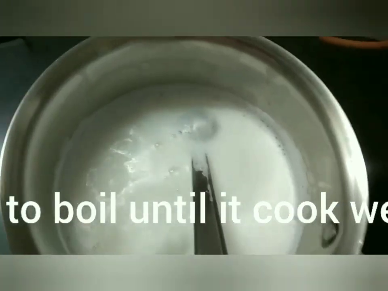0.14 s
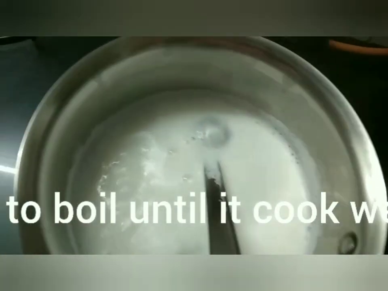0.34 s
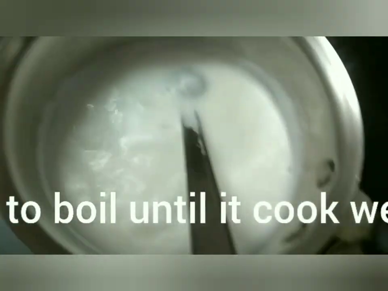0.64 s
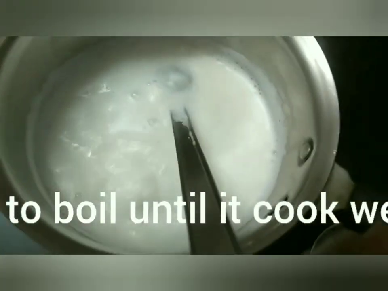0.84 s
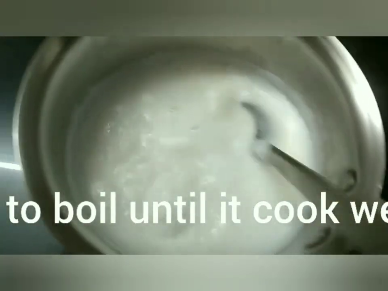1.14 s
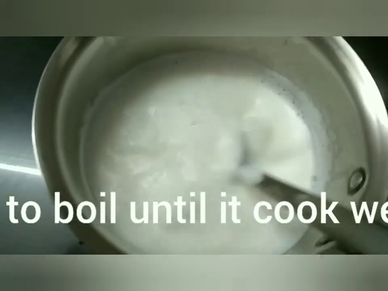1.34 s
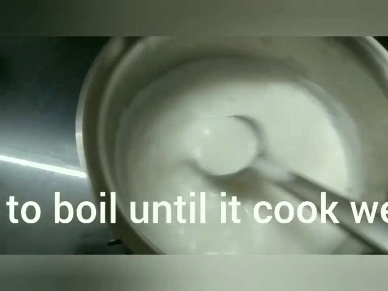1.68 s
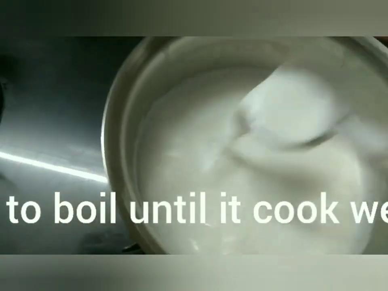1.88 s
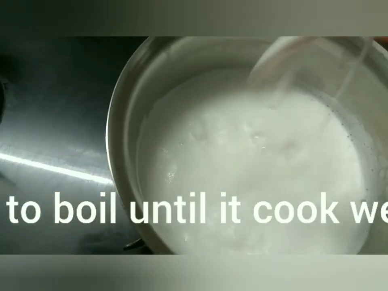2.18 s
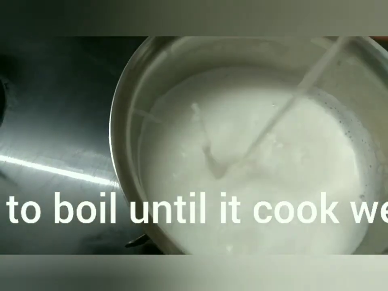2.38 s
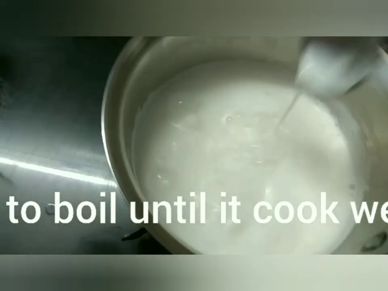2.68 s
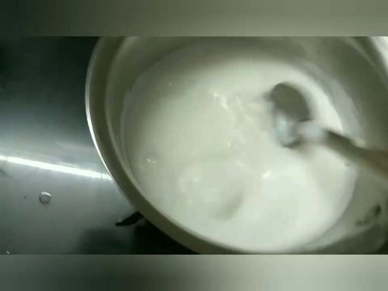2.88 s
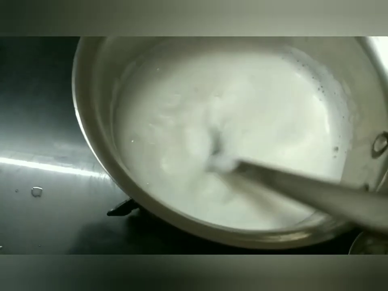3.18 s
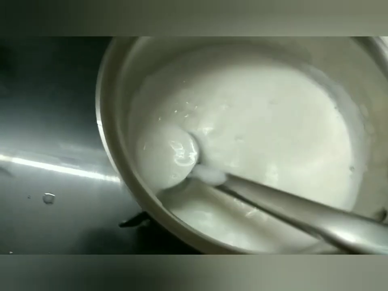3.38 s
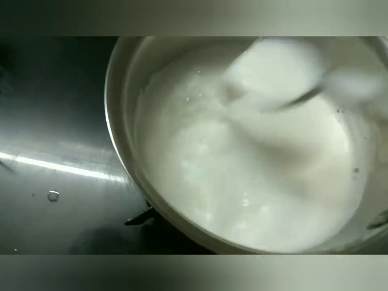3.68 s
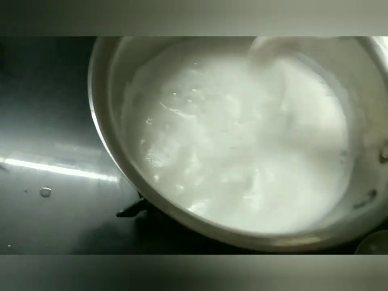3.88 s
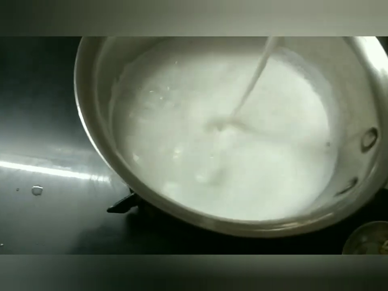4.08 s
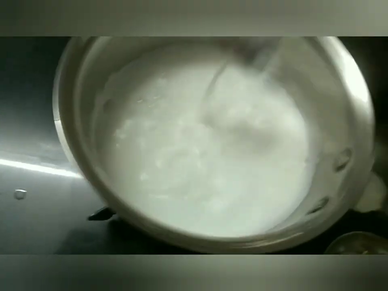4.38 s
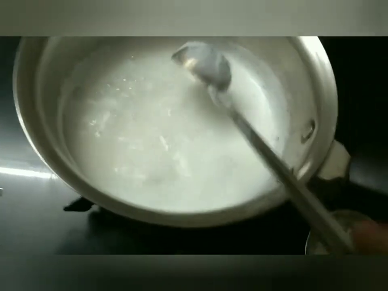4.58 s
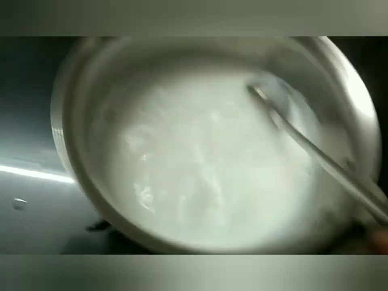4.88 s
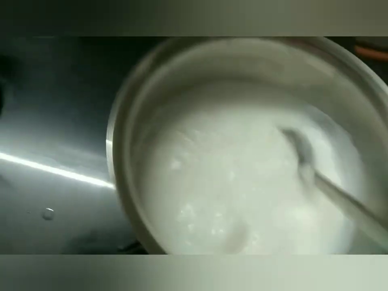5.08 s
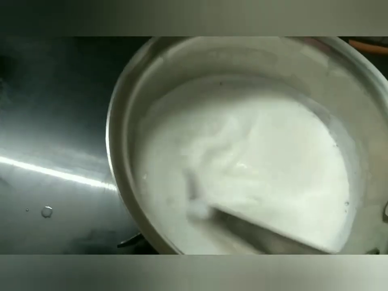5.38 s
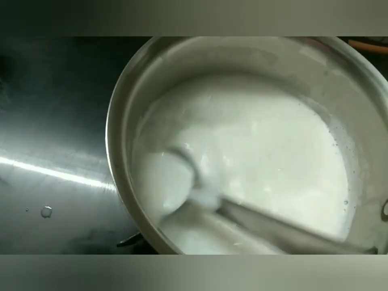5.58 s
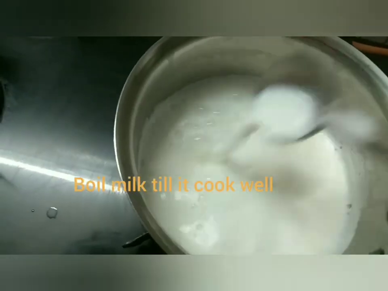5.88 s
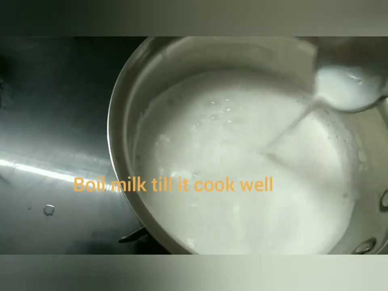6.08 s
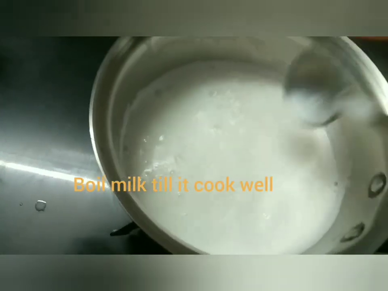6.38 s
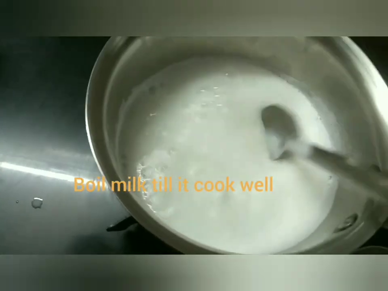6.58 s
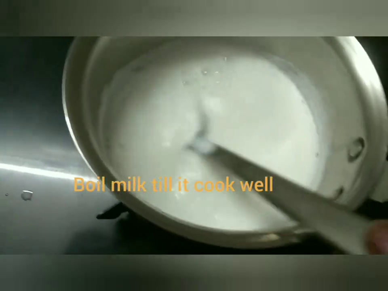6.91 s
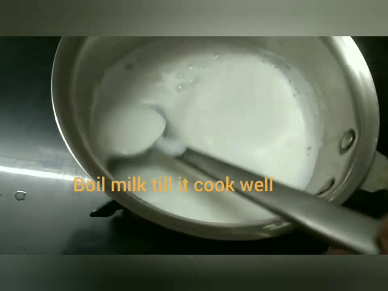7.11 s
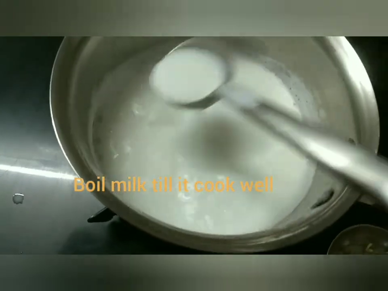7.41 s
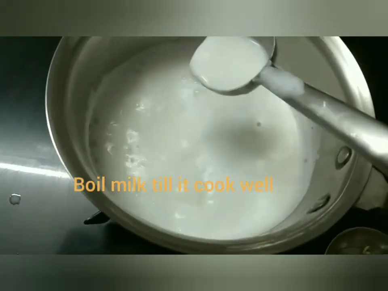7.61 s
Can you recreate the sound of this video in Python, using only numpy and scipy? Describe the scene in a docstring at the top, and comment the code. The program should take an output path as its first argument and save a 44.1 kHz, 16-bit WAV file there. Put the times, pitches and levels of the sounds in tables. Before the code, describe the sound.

A steel ladle scrapes and knocks sharply in a saucepan of milk, with thin splattering pours between strokes over a faint burner roar.

```python
"""A steel ladle scrapes and knocks the bottom of a saucepan of milk on a gas stove; between, milk pours back in.
Scrapes hiss and excite the pan's modes; knocks rattle, ring its wall and boom in its bottom.
The falling stream is sprayed noise, rising-pitch bubbles, splats and drumming on the bottom.
Underneath, bands of stereo noise make the burner's roar, a fine early sizzle and thin high tones.
A small hard kitchen answers with decaying noise; two close microphone ports hear it all."""
import sys
import numpy as np
from scipy import signal
from scipy.fft import rfft, irfft, next_fast_len
from scipy.io import wavfile
from scipy.ndimage import uniform_filter1d, map_coordinates

SR = 44100
rng = np.random.default_rng(int(sys.argv[2]) if len(sys.argv) > 2 else 0)


def convert_level_to_amplitude(level_db):
    """Map a level in decibels to its linear amplitude factor."""
    exponent = np.asarray(level_db, float) / 20
    return 10 ** exponent


def to_wav(s):
    """Save 16-bit WAV."""
    ch = np.atleast_2d(s).T  # columns
    pcm = np.round(np.clip(ch, -1, 1) * 32767)  # PCM
    wavfile.write(sys.argv[1], SR, pcm.astype(np.int16))


N = 341730

# modes of the milk-filled bottom of the pan: (frequency [Hz], relative level [dB], free t60 [s])
BOTTOM_MODES = [(148.3, -18.5, 0.1), (182, -6.5, 0.39), (229.9, 3, 0.15), (253.3, -2, 0.26),
                (316.8, -8, 0.18), (416, 1, 0.22), (480, 4, 0.13), (585, -13.5, .08), (730, -15, 0.074),
                (886, -9.5, .05), (904, -7.5, 0.061), (1150, -16.5, 0.07), (2032, -2.5, .12),
                (2196, -7, 0.13), (2415, -10.5, 0.24), (2910, -14, 0.062), (3780, -17, 0.058)]
# modes of the thin steel wall: (frequency [Hz], relative level [dB], free t60 [s])
WALL_MODES = [(7450, -18, 0.38), (8800, -19.5, 0.17), (8500, -22, 0.3), (8200, -26.5, 0.3),
              (9500, -3.5, 0.042), (9800, -14, 0.085), (9500, -1.5, 0.053), (10500, -21, 0.23),
              (10350, -15, 0.13), (10900, -6.5, 0.033), (10700, -15, 0.083), (10900, -27, 0.38),
              (10630, -13, 0.27), (11030, -17.5, 0.64), (12500, -15, 0.1), (12110, -19, 0.19),
              (12500, -22.5, 0.2), (13100, -31.5, 0.3)]
# blows that drum the bottom; the first is a ring already dying at the start:
# (time [s], relative level [dB], drumming t60 [s])
BLOW_EVENTS = [(.005, -57.5, 1.04), (2.401, -39.5, 0.6), (2.639, -39, 0.26), (3.989, -59, 0.28),
               (4.104, -41.5, 0.57), (4.32, -53, 0.79), (4.89, -51, 0.61), (7.008, -47.5, .3),
               (7.085, -52, 0.38), (7.185, -62, 0.33)]
BLOW_RISE_S = 0.0046


def unit(x):
    """Scaled to rms 1."""
    return x / np.sqrt(np.mean(x ** 2) + 1e-20)


def along(points, hz):
    """Interpolates (Hz, value) points on a log frequency axis."""
    f, v = np.transpose(points)
    return np.interp(np.log(hz + 1), np.log(f + 1), v)


def gains(*tables):
    """One gain per sample for each dB column; 20 ms fades to silence outside each table."""
    t, total = np.arange(N) / SR, 0
    for rows in tables:
        s, *columns = np.transpose(rows)
        fade_in = np.clip((t - s[0]) / 0.02 + 1, 0, 1)
        fade_out = np.clip((s[-1] - t) / 0.02 + 1, 0, 1)
        levels = convert_level_to_amplitude(np.array([np.interp(t, s, column) for column in columns]))
        total = total + fade_in * fade_out * levels
    return total


def wobble(rate):
    """A smooth random curve, rate knots a second."""
    knots = rng.standard_normal(int(N * rate / SR) + 4)
    return map_coordinates(knots, [np.arange(N) * rate / SR])


def filtered(x, response):
    """x times a complex response of frequency."""
    m = next_fast_len(N + SR // 2)
    spectrum = rfft(x, m) * response(np.fft.rfftfreq(m, 1 / SR))
    return irfft(spectrum, m)[..., :N]


def coloured(x, spectrum, patchy_db):
    """x given a spectrum and narrow patches of random gain that last some 50 ms; rms 1."""
    z = signal.stft(x, nperseg=1024)[2]
    field = rng.standard_normal(z.shape[-2:])
    field = uniform_filter1d(field, size=5, axis=0)  # across frequency
    field = uniform_filter1d(field, size=4, axis=1)  # across time
    patched = signal.istft(z * convert_level_to_amplitude(patchy_db * unit(field)), nperseg=1024)[1][..., :N]
    return unit(filtered(patched, lambda hz: convert_level_to_amplitude(along(spectrum, hz))))


def ring(modes, scatter_db):
    """One tap on a set of modes: decaying sines of randomly scattered levels, peak 1."""
    t = np.arange(SR // 2) / SR
    hz, db, t60 = np.transpose(modes)[:, :, None]
    level = db + scatter_db * rng.standard_normal(db.shape) - 60 * t / t60
    tone = (convert_level_to_amplitude(level) * np.sin(2 * np.pi * hz * t)).sum(0)
    return tone / np.abs(tone).max()


def rubbed(modes, damping):
    """The modes driven by random force; contact shortens their ring. Rms 1."""
    damped = [(hz, db, t60 * damping) for hz, db, t60 in modes]
    force = rng.standard_normal(N)
    return unit(signal.fftconvolve(force, ring(damped, scatter_db=3.0))[:N])


def grit(rough_db, rate):
    """Noise whose strength jumps about, as tiny contacts come and go."""
    return convert_level_to_amplitude(rough_db * wobble(rate)) * rng.standard_normal(N)


def add(track, s, sound):
    """Mixes a sound into the track at a time, cut at the track's end."""
    part = track[round(s * SR):][:len(sound)]
    part += sound[:len(part)]


def blip(hz, cycles, rise):
    """A bubble: a damped sine whose pitch rises."""
    u = np.arange(int(5 * cycles * SR / hz)) * hz / SR  # time in cycles
    tone = np.sin(2 * np.pi * u * (1 + rise * u / cycles))
    return tone * np.exp(-u / cycles) * (1 - np.exp(-u / 0.17))


def knocks():
    """Each knock: a rattling crack, the wall's dense ring and the boom of the bottom."""
    # ladle knocks: (time [s], relative level [dB], boom over that level [dB],
    # place [0 centre - 1 rim], time constant of the swell [s])
    knock_events = [(3.131, -5, -11, 0.015, 0.0023), (3.254, -18, -39.5, 0.68, 0.001),
                    (5.0694, -4, -17.5, .45, 0.0023), (5.5073, -9.5, -36, 1, .0003),
                    (6.756, -2.5, -14.5, .06, 0.0022)]
    # crack: (frequency [Hz], relative density [dB])
    crack_spectrum = [(410, -36), (700, -3.5), (1460, -16), (2060, -5), (2750, -18.5), (5230, -33),
                      (6210, -12), (8620, -11), (9960, 3.5), (13700, -5.5), (15200, -12.5), (16200, -28)]
    # the bottom's four groups of modes, deep to high, for a centre knock: (level over the boom [dB])
    centre_db = [0, -9.5, -19, -15.5]
    # the same groups: (gain from centre to rim [dB])
    rim_gain_db = [0, 21, 35, 0]
    groups = (BOTTOM_MODES[:5], BOTTOM_MODES[5:7], BOTTOM_MODES[7:12], BOTTOM_MODES[12:])
    crack, shimmer, tones = np.zeros(N), np.zeros(N), np.zeros(N)
    t = np.arange(SR // 2) / SR
    for s, db, boom_db, place, swell_s in knock_events:
        swell = (1 - np.exp(-t / swell_s)) ** 2  # each knock swells in over a few milliseconds
        rattle_t60 = 0.027 + 9.5 * swell_s  # longer after a slow swell
        decay = convert_level_to_amplitude(-60 * t / rattle_t60) + convert_level_to_amplitude(-9.5 - 60 * t / 0.17)
        add(crack, s, convert_level_to_amplitude(db - 7) * swell * decay)
        add(shimmer, s, convert_level_to_amplitude(db - 10.5 - 60 * t / 0.095) * swell)
        group_db = boom_db + np.array(centre_db) + place * np.array(rim_gain_db)
        for level_db, modes in zip(group_db, groups):
            boom = ring(modes, scatter_db=2) * (1 - np.exp(-t / 0.005))
            add(tones, s + 0.002, convert_level_to_amplitude(db + level_db + 3) * boom)
    rattle = coloured(grit(rough_db=3, rate=400), crack_spectrum, patchy_db=2.5)
    return crack * rattle + shimmer * rubbed(WALL_MODES, damping=0.24) + tones


def scrapes():
    """Steel on steel: gritty hiss that also excites the wall and the bottom."""
    # ladle dragged over the bottom in four strokes, the second and third broken in two by knocks at 3.25 s and
    # 5.5 s: (time [s], hiss [dB], rumble [dB])
    strokes = [
        [(0.8, -76.5, -86), (0.874, -40.5, -57), (0.95, -21, -72), (0.962, -25, -57), (1.048, -59.5, -61.5),
         (1.086, -28.5, -60.5), (1.146, -26, -57.5), (1.254, -44, -51.5), (1.286, -31.5, -54.5),
         (1.408, -22, -47), (1.488, -28, -54.5), (1.588, -56, -67), (1.66, -62.5, -77)],
        [(3.17, -33, -49), (3.24, -52.5, -44.5)],
        [(3.28, -34, -45), (3.292, -36.5, -47.5), (3.32, -53.5, -52.5), (3.476, -73, -60), (3.52, -78, -72)],
        [(5.1, -29.5, -37.5), (5.17, -22, -48), (5.244, -25, -49.5), (5.422, -24, -56.5), (5.436, -35, -53.5),
         (5.48, -21, -52.5), (5.495, -27.5, -54.5)],
        [(5.53, -26.5, -41.5), (5.54, -39, -47), (5.588, -39.5, -44.5), (5.61, -52.5, -51.5), (5.67, -65, -53),
         (5.76, -80.5, -69.5)],
        [(6.79, -24, -60), (6.82, -30.5, -57), (6.886, -29, -57), (7.012, -36, -57), (7.032, -51.5, -56.5),
         (7.17, -79.5, -60), (7.18, -87, -58)],
    ]
    # bright hiss: (frequency [Hz], relative density [dB])
    hiss_spectrum = [(2650, -56), (4500, -24), (5390, -21.5), (6030, -15), (7370, -9.5), (8240, -6),
                     (9360, -4), (10900, 2), (14100, -8), (15000, -15.5), (16000, -23)]
    # duller grind: (frequency [Hz], relative density [dB])
    grind_spectrum = [(350, -31.5), (600, -5), (1240, -5.5), (1490, -13), (2080, -1.5), (3110, -8.5),
                      (3560, -5), (4600, 0.5), (5980, -37), (10100, -120)]
    hiss, rumble = gains(*strokes)
    grind = convert_level_to_amplitude(-30) * hiss ** 0.74 + convert_level_to_amplitude(-25) * rumble  # the grind swings less than the hiss
    chatter = convert_level_to_amplitude(1.4 * wobble(60))  # the edge of the ladle skips
    bright = coloured(grit(rough_db=1.0, rate=1000), hiss_spectrum, patchy_db=4.5)
    bright = bright + 0.38 * rubbed(WALL_MODES, damping=0.23)
    dull = coloured(grit(rough_db=2.5, rate=120), grind_spectrum, patchy_db=5.0)
    deep = rubbed(BOTTOM_MODES[1:5], damping=0.16) + 0.6 * rubbed(BOTTOM_MODES[5:8], damping=0.32)
    return chatter * (hiss * unit(bright) + grind * dull) + rumble * unit(deep)


def stream():
    """Gains of spray, fizz, patter and drumming, from the pours, slops and blows."""
    # milk running off the ladle, one list a pour: (time [s], spray [dB], gurgle [dB])
    pour_levels = [
        [(2.1, -74, -72), (2.198, -51.5, -59), (2.304, -69, -62.5), (2.454, -45, -51.5), (2.574, -53, -49),
         (2.616, -46, -57), (2.74, -53, -46.5), (2.81, -71, -57.5), (2.92, -81.5, -72)],
        [(3.86, -75.5, -67), (3.924, -73.5, -59.5), (4.022, -57, -61), (4.148, -56.5, -58.5),
         (4.31, -52, -51.5), (4.39, -51, -59), (4.434, -47.5, -55.5), (4.542, -52, -60), (4.608, -72, -60.5),
         (4.72, -79.5, -71)],
        [(6.18, -75, -77), (6.274, -66, -70), (6.368, -75, -75), (6.504, -69.5, -64.5), (6.56, -81.5, -81)],
    ]
    # milk slopping round the ladle: (time [s], length [s], relative fizz [dB], relative patter [dB])
    slop_events = [(0.089, 0.26, -64, -76), (0.603, 0.13, -57, -64), (2.043, .12, -61.5, -60.5),
                   (3.351, 0.074, -51.5, -71), (3.56, 0.11, -72.5, -67.5), (4.86, 0.16, -85, -62.5),
                   (6.053, .13, -56, -70), (6.65, .08, -68, -66), (7.188, 0.11, -70.5, -53.5),
                   (7.37, 0.066, -74, -69)]
    spray, gurgle = gains(*pour_levels)
    fizz = convert_level_to_amplitude(-10.5) * spray + convert_level_to_amplitude(-9.5) * gurgle
    patter = gurgle.copy()
    drum = convert_level_to_amplitude(-6.5) * gurgle
    for s, length_s, fizz_db, patter_db in slop_events:
        u = np.arange(round(length_s * SR)) / (length_s * SR)
        swell = np.clip(np.minimum(u / 0.16, (1 - u) / 0.58), 0, 1)  # rise and fall, shares of the length
        add(fizz, s, convert_level_to_amplitude(fizz_db) * swell)
        add(patter, s, convert_level_to_amplitude(patter_db) * swell)
    t = np.arange(SR // 2) / SR
    for s, db, t60 in BLOW_EVENTS:
        add(drum, s, convert_level_to_amplitude(db - 60 * t / t60) * (1 - np.exp(-t / BLOW_RISE_S)))
    return spray, fizz, patter, drum


def froth(count, low_hz, span, cycles, spread_db):
    """A dense random stream of bubbles, most of them quiet; rms 1."""
    track = np.zeros(N)
    for when, pitch, size in rng.random((count, 3)):
        bubble = blip(low_hz * span ** pitch, cycles, rise=0.021)
        add(track, when * N / SR, convert_level_to_amplitude(spread_db * size ** 4) * bubble)
    return unit(track)


def pours():
    """The stream: spray, fine fizz, a patter of larger bubbles, and the bottom drummed through the milk."""
    # spray: (frequency [Hz], relative density [dB])
    spray_spectrum = [(2650, -41), (4500, -26), (5420, -12), (5960, -7), (7330, -3), (9820, -3.5),
                      (12600, -2.5), (14900, -16.5), (16000, -26.5)]
    # swish within the fizz: (frequency [Hz], relative density [dB])
    swish_spectrum = [(710, -31), (1200, -3), (4660, -10.5), (6220, -7), (6750, -18), (7000, -21),
                      (9100, -47), (15400, -120)]
    spray, fizz, patter, drum = stream()
    mist = coloured(grit(rough_db=3.5, rate=320), spray_spectrum, patchy_db=3)
    small = froth(count=6000, low_hz=2050, span=1.8, cycles=3.3, spread_db=8.5)
    swish = coloured(grit(rough_db=4.5, rate=200), swish_spectrum, patchy_db=6.5)
    large = froth(count=4000, low_hz=385, span=5, cycles=1.8, spread_db=16.5)
    thud = convert_level_to_amplitude(2.9 * wobble(40)) * rubbed(BOTTOM_MODES[:5], damping=0.44)
    fine = convert_level_to_amplitude(-3.0) * fizz * unit(small + 0.8 * swish)
    return spray * mist + fine + convert_level_to_amplitude(-4.0) * patter * large + convert_level_to_amplitude(-2) * drum * unit(thud)


def drops():
    """Splats: noise bursts with a ringing blip, high ones brighter, over a duller body; plops: short low blips."""
    # drops bursting on the surface: (time [s], relative level [dB], centre [Hz], body over that level [dB])
    splat_events = [(2.0623, -43.5, 3870, -12.5), (2.1462, -38, 12100, -23), (2.2016, -32, 6080, -0.5),
                    (2.2244, -33, 8900, -30), (2.2761, -22.5, 8250, -9.5), (2.3073, -30.5, 11570, -29),
                    (2.3983, -32, 2960, -3), (2.4041, -15, 11360, -17), (2.4759, -23.5, 9560, -24.5),
                    (2.5828, -21.5, 11300, -17), (2.6185, -18.5, 10960, -37), (2.6544, -25.5, 10940, -6),
                    (3.5926, -43, 2680, -15), (3.9664, -46.5, 6080, 8), (3.9925, -29, 6260, -5),
                    (4.0334, -40, 5900, -24.5), (4.0476, -47, 5750, -13), (4.1051, -28.5, 11100, -12),
                    (4.185, -35.5, 11100, -10), (4.2231, -26, 10300, -35), (4.2582, -17.5, 11900, -32),
                    (4.3254, -13, 10900, -21), (4.3408, -19.5, 8830, -13.5), (4.357, -30.5, 10630, -30),
                    (4.4047, -22.5, 7920, -15), (6.2243, -29, 12500, -11), (6.2562, -46, 3570, 2),
                    (6.2835, -28.5, 11900, -16), (6.3892, -38, 3940, 3.5), (6.414, -25.5, 10300, -4.5),
                    (6.456, -42, 6060, -6.5), (6.6989, -40.5, 13460, -4), (7.219, -46.5, 4240, -10),
                    (7.3878, -49.5, 2610, -32)]
    # air pockets closing under the stream: (time [s], relative level [dB], starting pitch [Hz])
    plop_events = [(2.201, -34.5, 790), (2.404, -32.5, 333), (2.448, -28.5, 780), (2.487, -27.5, 746),
                   (2.539, -45, 1150), (2.539, -31, 692), (2.573, -28.5, 940), (2.585, -32.5, 453),
                   (2.618, -21, 730), (2.633, -27, 866), (2.653, -26, 480), (2.71, -43, 457),
                   (3.966, -36, 830), (3.992, -31, 930), (4.004, -39, 710), (4.106, -31.5, 480),
                   (4.185, -33.5, 470), (4.267, -36.5, 730), (4.324, -35, 920), (4.339, -29, 770),
                   (4.412, -41.5, 380), (4.428, -46, 388), (4.484, -39, 900), (4.886, -44.5, 466),
                   (6.021, -53.5, 706), (6.1, -43, 765), (6.223, -41.5, 2000), (6.284, -41.5, 1660),
                   (6.411, -33, 2200), (6.671, -45.5, 738), (6.698, -40, 1670)]
    track, treble, body = np.zeros(N), np.zeros(N), np.zeros(N)
    t = np.arange(SR // 25) / SR
    for s, db, hz, body_db in splat_events:
        decay = convert_level_to_amplitude(-60 * t / 0.0091) + convert_level_to_amplitude(-21.0 - 60 * t / 0.1)
        burst = rng.standard_normal((2, len(t))) * decay * (1 - np.exp(-t / 0.00047))
        add(treble, s, convert_level_to_amplitude(db - 2.5) * hz / 11000 * burst[0])  # high splats have more treble
        add(body, s, convert_level_to_amplitude(db + body_db + 6.0) * burst[1])
        add(track, s, convert_level_to_amplitude(db - 5.5) * blip(hz, cycles=11, rise=0.0085))
    for s, db, hz in plop_events:
        add(track, s, convert_level_to_amplitude(db + 2.5) * blip(hz, cycles=1.27, rise=0.0065))
    body_band = signal.butter(2, [700, 4500], "bandpass", fs=SR, output="sos")
    treble_band = signal.butter(2, [5500, 14000], "bandpass", fs=SR, output="sos")
    return track + signal.sosfilt(body_band, body) + signal.sosfilt(treble_band, treble)


def thumps():
    """The front of each blow rings the deep modes of the bottom once."""
    track, t = np.zeros(N), np.arange(SR // 2) / SR
    for s, db, _ in BLOW_EVENTS:
        front = ring(BOTTOM_MODES[:5], scatter_db=4) * (1 - np.exp(-t / BLOW_RISE_S))
        add(track, s, convert_level_to_amplitude(db + 5) * front)
    return track


def wide(spectrum, patchy_db):
    """Stereo noise of rms 1, less alike where the sound comes from all sides."""
    # the background at the two ports: (frequency [Hz], left-right likeness [1 = same])
    likeness = [(60, 0.75), (180, 0.68), (550, 0.7), (1650, 0.056), (4970, 0.11), (15000, 0.98)]

    def turn(hz):
        return np.arccos(np.clip(along(likeness, hz), -1, 1)) / 2

    pair = coloured(rng.standard_normal((2, N)), spectrum, patchy_db)
    mid, side = filtered(pair, lambda hz: np.array([np.cos(turn(hz)), np.sin(turn(hz))]))
    return unit(np.array([mid + side, mid - side]))


def burner():
    """The flame's low roar and its jet's band of noise, with a fine sizzle and thin high tones in noise."""
    # background; the sizzle is strongest in the first two seconds, perhaps the ladle resting against the pan:
    # (time [s], roar [dB], sizzle [dB], high tones [dB])
    background_levels = [(0, -57.5, -55.5, -90), (.4, -64.5, -57, -63), (.8, -59.5, -66, -65),
                         (1.7, -65, -62.5, -77), (2.2, -63, -73, -71.5), (3.6, -65, -85, -77.5),
                         (4.75, -65.5, -90.5, -74), (6, -69, -83, -73.5), (7.2, -64.5, -90, -76.5),
                         (7.75, -71.5, -88, -84.5)]
    # low roar: (frequency [Hz], relative density [dB])
    roar_spectrum = [(15, -59), (25, -39.5), (64, -29.5), (77, -17), (112, 5), (189, -3.5), (251, -17.5),
                     (400, -18.5), (580, -8.5), (1120, -11.5), (1310, -11.5), (1400, -19.5), (1820, -40),
                     (3080, -120)]
    # steady jet: (frequency [Hz], relative density [dB])
    jet_spectrum = [(760, -46.5), (1300, -19.5), (1770, 1), (2040, -12), (2380, -18), (2670, -26.5),
                    (3060, -42.5), (3550, -32.5), (6500, -46.5), (8450, -61.5), (14300, -120)]
    # fine sizzle: (frequency [Hz], relative density [dB])
    sizzle_spectrum = [(2940, -54.5), (5000, -19), (6900, -17), (7230, -9), (8620, -8.5), (10800, 4),
                       (12700, -9), (14000, -10.5), (15500, -24.5)]
    # thin high tones, the lowest like the steel wall ringing on: (frequency [Hz], width [Hz], relative level [dB])
    high_tones = [(7450, 160, -1), (10300, 35, -5), (11100, 460, -3.5), (11900, 78, -9)]

    def resonances(f):
        return sum(convert_level_to_amplitude(db) * w * w / (w * w + (f - centre) ** 2) for centre, w, db in high_tones)

    roar, sizzle, tone = gains(background_levels)
    flat = [(100, 0.0013), (16000, 0.011)]  # all but flat: (Hz, dB)
    thin = unit(filtered(wide(flat, patchy_db=5.5), resonances))
    low = convert_level_to_amplitude(3.7 * wobble(6.4)) * wide(roar_spectrum, patchy_db=3.0)
    jet = convert_level_to_amplitude(0.44 * wobble(8.6)) * wide(jet_spectrum, patchy_db=2.0)
    fine = convert_level_to_amplitude(1.2 * wobble(5.1)) * sizzle * wide(sizzle_spectrum, patchy_db=6)
    return roar * low + convert_level_to_amplitude(-63) * jet + fine + convert_level_to_amplitude(2.5 * wobble(3)) * tone * thin


def kitchen(x):
    """The room's answer: stereo noise in which each frequency dies at its own speed."""
    # decay of the small hard kitchen: (frequency [Hz], t60 [s])
    decay_times = [(200, 0.23), (2000, 0.34), (10000, 0.16)]
    hz, t, z = signal.stft(rng.standard_normal((2, SR // 2)), SR, nperseg=256)
    decay = convert_level_to_amplitude(-60 * t / along(decay_times, hz)[:, None])
    tail = signal.istft(z * decay, SR, nperseg=256)[1]
    late = np.pad(x, (200, 0))[None]  # the answer comes 200 samples later
    return signal.fftconvolve(late, tail / np.linalg.norm(tail[0]), axes=1)[:, :N]


def ports(x, balance, lead):
    """The two ports hear a source at different strengths and phases, half the difference on each side."""
    side = np.array([[1], [-1]]) / 2
    return filtered(x, lambda hz: convert_level_to_amplitude(side * along(balance, hz)) * np.exp(1j * side * lead(hz)))


def scene():
    """Steel and milk close to the microphone in the kitchen, over the burner."""
    # steel at the microphone: (frequency [Hz], left over right [dB])
    steel_balance = [(60, 2), (99, -6), (160, 0), (270, 2), (450, 2), (740, 6.5), (1220, -2.5), (2010, 12),
                     (3330, 6), (5500, 10.5), (9080, 2.5), (15000, 6)]
    # steel at the microphone: (frequency [Hz], lead of the left port [radians])
    steel_lead = [(0, 0), (600, 0.2), (1980, -1.7), (2840, -2.4), (3190, 0.6), (4310, -3.3), (5080, -3.4),
                  (6200, 2.4), (7240, 13.4), (7670, 12.5), (8960, 12.6), (14600, 12.5), (15800, 12.6),
                  (16400, 12.5)]
    # milk at the microphone: (frequency [Hz], left over right [dB])
    milk_balance = [(60, -1.5), (180, 3), (550, -1.5), (1650, 18), (4970, 4.5), (15000, 11)]
    steel = knocks() + scrapes()
    milk = pours() + drops() + thumps()
    # a small pan radiates no deep bass
    steel = signal.sosfilt(signal.butter(2, 120, "highpass", fs=SR, output="sos"), steel)
    near = ports(steel, steel_balance, lambda hz: along(steel_lead, hz))
    # the left port is further from the milk: 0.2 ms
    near = near + ports(milk, milk_balance, lambda hz: -2 * np.pi * hz * 0.0002)
    room = kitchen(convert_level_to_amplitude(-6.5) * steel + convert_level_to_amplitude(-5.5) * milk)
    return near + room + burner() * convert_level_to_amplitude(np.array([[1.2], [-1.2]]))  # background stronger on the left


def top_cut(x):
    """Nothing passes above the cut-off."""
    return signal.sosfilt(signal.butter(12, 16790, fs=SR, output="sos"), x)


def record(dry):
    """A small microphone with weak deep bass; little is heard above 15.8 kHz."""
    bass_cut = signal.sosfilt(signal.butter(1, 170, "highpass", fs=SR, output="sos"), dry)
    heard = filtered(bass_cut, lambda hz: np.where(hz < 15800, 1, convert_level_to_amplitude(-30.5)))
    return top_cut(heard)


dry = scene()
out = record(dry)
to_wav(out)
```